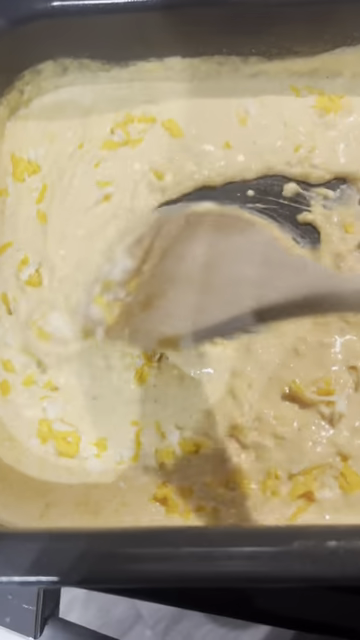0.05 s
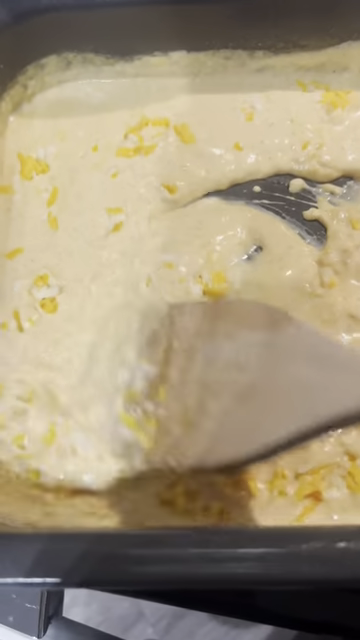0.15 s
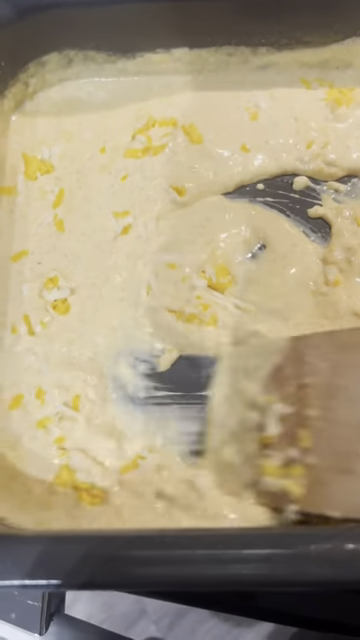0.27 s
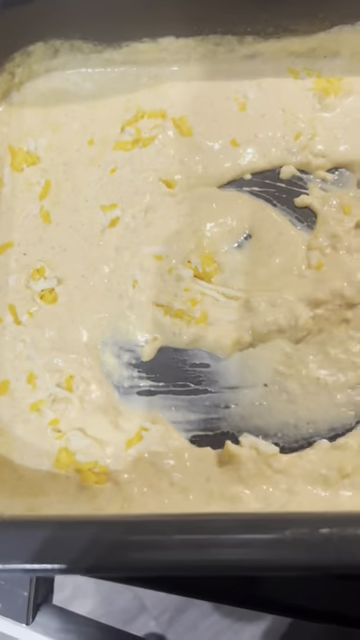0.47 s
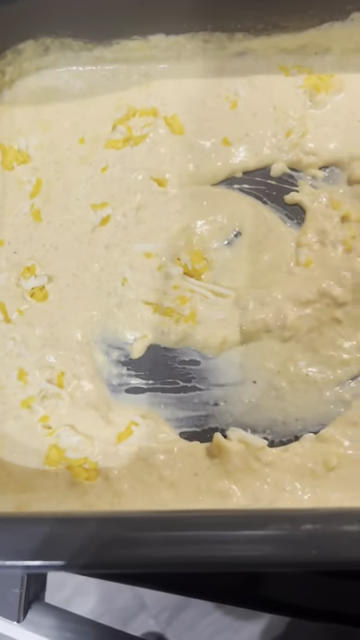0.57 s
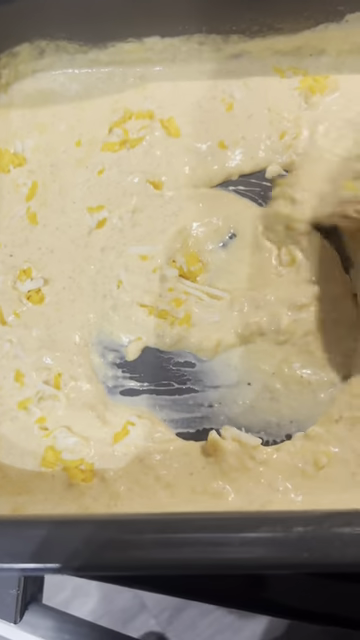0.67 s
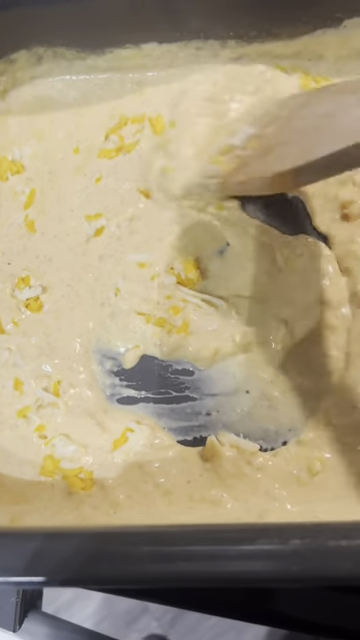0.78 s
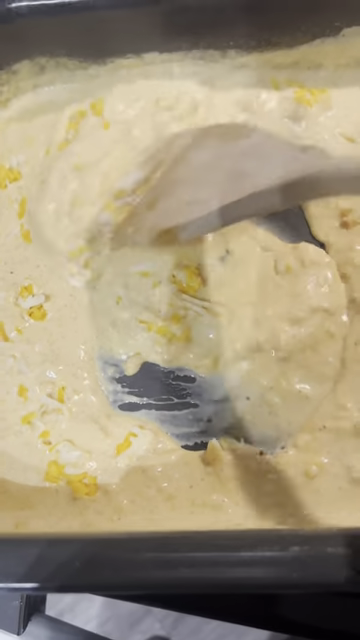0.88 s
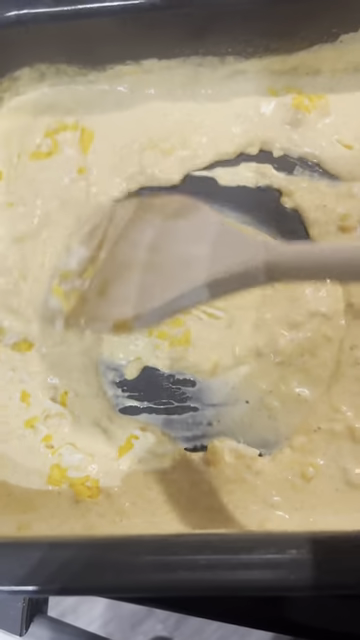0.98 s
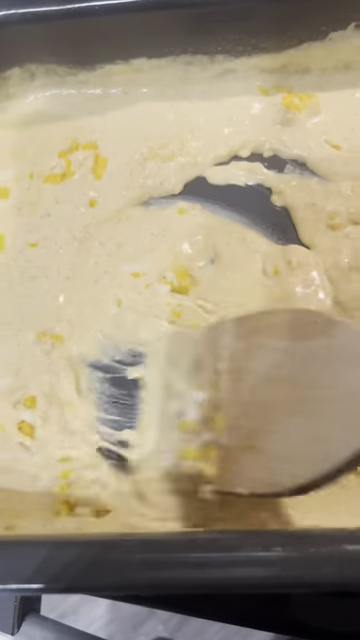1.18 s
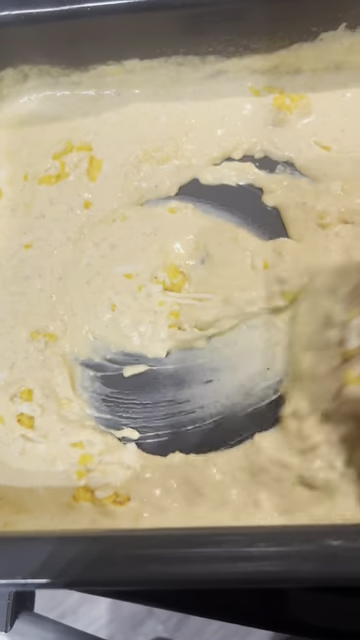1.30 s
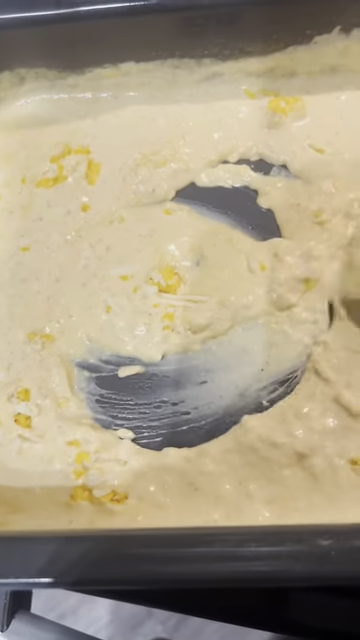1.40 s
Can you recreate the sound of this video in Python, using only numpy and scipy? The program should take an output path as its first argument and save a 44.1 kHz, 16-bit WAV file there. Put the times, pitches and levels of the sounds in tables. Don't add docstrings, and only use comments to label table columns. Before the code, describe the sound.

Wooden spoon stirring thick sauce, soft scraping and squelching, one hollow knock, low fan rush behind

```python
import sys
import numpy as np
from scipy import signal
from scipy.fft import rfft, irfft, next_fast_len
from scipy.io import wavfile
from scipy.ndimage import uniform_filter1d, map_coordinates

SR = 44100
rng = np.random.default_rng(int(sys.argv[2]) if len(sys.argv) > 2 else 0)


def waveform_to_disk(signal):
    frames = np.transpose(np.atleast_2d(signal))
    scaled = np.clip(frames, -1, 1) * 32767
    samples = np.round(scaled).astype(np.int16)
    wavfile.write(sys.argv[1], SR, samples)


def field_ratio(decibels):
    return 10 ** (np.asarray(decibels, dtype=float) / 20)


N = 63945

# (frequency [Hz], correlation [1])
LIKENESS = [(60, .98), (150, .97), (290, .83), (640, .2), (1400, .5), (3100, .4), (6800, .5), (15000, .7)]

# (frequency [Hz], density [dB/Hz])
FAN_SPECTRUM = [(20, -18.5), (45, -10.5), (128, -8.5), (340, -11.5), (600, -18), (2020, -34.5), (4500, -46),
                (12500, -55), (14600, -76)]
# (time [s], level [dB])
FAN_LOAD = [(0, 0), (.6, -1), (.9, 1), (1.2, .5), (1.45, -0.5)]
# (frequency [Hz], width [Hz], level [dB])
RUMBLE_MODES = [(65, 23.5, 1), (84, 37.3, 2)]
# (frequency [Hz], level [dB rms])
MAINS_HUM = [(120, -64.5)]
FAN_DB, RUMBLE_DB = -56, -64.5

# (time [s], pressure [dB], wetness [dB], sauce hollow pitch [Hz])
STROKE = [(0, -61.5, -2.5, 750), (.075, -67, 6.5, 853), (.104, -68.5, -1, 719), (.2, -67, -5.5, 750),
          (.29, -72, -6.5, 720), (.40, -92, 9.5, 768), (.6, -87.5, 9, 754), (.65, -65, 1.5, 950),
          (.72, -59, -10.5, 1000), (.745, -55, -3, 1050), (.86, -56, -5, 1228), (.965, -60.5, -3.5, 1000),
          (1.0, -63, -5, 740), (1.12, -72, -4, 700), (1.21, -66.5, -9, 717), (1.32, -86, -22, 717),
          (1.34, -90, -1, 734), (1.45, -73, -8, 700)]
# (time [s], pitch [Hz])
GAP_PITCH = [(0, 1750), (.04, 1850), (.08, 2400), (.2, 2505), (.645, 1942), (.7, 2403), (.82, 2495),
             (.87, 2106), (.925, 1750), (1.0, 1905), (1.06, 2480), (1.2, 1682), (1.45, 2315)]
# (frequency [Hz], density [dB/Hz])
SLIDE_SPECTRUM = [(180, -52), (300, -18), (389, -15.5), (566, -26), (1180, 1), (1490, -6.5), (5000, -28),
                  (6500, -76), (11000, -120)]
# (frequency [Hz], width [Hz], level [dB])
PAN_MODES = [(1750, 78, 3), (2280, 34, -7), (2502, 56, 6), (3200, 37, 1.5), (4000, 160, -7.5),
             (6300, 57, -20)]
# (frequency [Hz], width [Hz], level [dB])
GROAN_MODES = [(328, 120, -3.5), (525, 13, 1), (700, 103, 0)]
# (frequency [Hz], density [dB/Hz])
FIZZ_SPECTRUM = [(1760, -16.5), (3000, -8), (3260, -12.5), (3560, -8.5), (7850, -14.5), (13700, -42),
                 (15500, -50)]
HOLLOW_DB, GAP_DB, BODY_DB, GROAN_DB = -5.5, -7.5, -5.5, -2.5
HOLLOW_WIDTH_HZ, GAP_WIDTH_HZ, LEFT_DB = 104, 220, -0.5

# (time [s], peak [dB], pitch [Hz], spread [octaves], t60 [s])
SQUELCHES = [(.012, -54.5, 1790, 0.31, 0.22), (.06, -56, 2220, 0.13, .03), (.065, -57, 5500, 0.13, 0.087),
             (.08, -64, 2430, .1, .04), (.04, -63, 4680, .2, .1), (.15, -56.5, 387, 0.073, 0.083),
             (.565, -68, 7400, 0.31, 0.58), (.635, -46.5, 700, 0.7, 0.32), (.84, -50, 2170, 0.44, 0.41),
             (.9, -57, 1920, 0.23, .3), (.645, -63.5, 1950, 0.072, 0.037), (.66, -50, 962, 0.12, 0.15),
             (.67, -47.5, 447, 0.39, 0.13), (.69, -52.5, 937.6, 0.12, 0.11), (.69, -68, 2350, 0.14, .15),
             (.737, -45, 850, 0.77, 0.041), (.75, -50, 700, 0.31, 0.22), (.76, -56, 3240, 0.068, 0.12),
             (.789, -49.5, 1170, .15, 0.041), (.835, -55, 1170, .12, 0.064), (.832, -51, 1971, .2, 0.05),
             (.852, -53.5, 3150, 0.073, 0.039), (.872, -59, 2140, 0.14, 0.033),
             (.917, -52, 1750, 0.11, 0.033), (.96, -61, 3000, 0.081, 0.09), (.963, -51, 700, .6, .03),
             (1.115, -57, 680, 0.17, 0.3), (1.19, -57.5, 693, .15, 0.45), (1.2, -59, 1350, .3, 0.19),
             (1.295, -60, 700, 0.12, 0.076), (1.295, -62.5, 1230, 0.36, .12),
             (1.312, -50, 380, 0.29, 0.081), (1.32, -51.5, 230, 0.42, 0.071)]
# (time [s], peak [dB], pitch [Hz], spread [octaves], t60 [s])
FILM_POPS = [(.104, -61.5, 9500, .5, .01), (.1516, -53.5, 2430, 0.22, 0.029),
             (.152, -52.5, 5550, 1.1, 0.012), (.3157, -48.5, 6700, 0.48, 0.015),
             (.3446, -61.5, 3300, 0.054, 0.094), (.336, -67, 13000, .3, .03),
             (.405, -64, 13700, 0.83, 0.024), (.4898, -58, 14500, 0.88, .015),
             (.5641, -67.5, 12000, 0.95, 0.016), (.581, -69, 14430, .3, .015),
             (.6374, -50, 14200, 0.51, 0.021), (.6505, -64, 14500, .3, .015),
             (.682, -71, 13500, .5, 0.0093), (.633, -64, 3870, 0.082, .03),
             (.6405, -53.5, 2400, 0.44, 0.011), (.7357, -47, 5600, 1.5, 0.023),
             (.746, -44, 2300, 0.75, 0.018), (.7465, -57, 12500, 0.97, 0.026),
             (1.0311, -45, 14500, 0.59, 0.02), (1.04, -72, 14300, .5, 0.033),
             (1.1144, -61.5, 4560, 0.5, .02), (1.123, -59.5, 9940, 0.83, 0.0091),
             (1.137, -68, 14500, 0.54, 0.023), (1.1997, -61, 9430, 0.5, .015),
             (1.2381, -60.5, 10100, 0.38, 0.012), (1.3259, -59.5, 15000, .3, .015),
             (1.341, -64, 14200, 0.7, 0.016), (1.378, -70, 12100, .5, .012), (1.389, -75, 15000, .2, .08)]

# (time [s], length [s], level [dB])
THROWS = [
    (0.218, 0.084, -66),
    (0.321, 0.076, -65.5),
]
# (frequency [Hz], density [dB/Hz])
SPRAY_SPECTRUM = [(1470, -25), (2500, -6.5), (3830, -16.5), (8100, -8), (15500, -26)]

# (frequency [Hz], level [dB], t60 [s], left minus right [dB], left lag [cycles])
EDGE_MODES = [(990, -7, .065, 4.5, .72), (515, -5.5, .14, -6, .62), (1381, -27, .09, 2, .8),
              (1149, -9, .03, -3, .54), (2455, -27, .04, -1, .2)]
# (frequency [Hz], level [dB], t60 [s], left minus right [dB], left lag [cycles])
FLAT_MODES = [(490, -3.5, .062, -1.7, .24), (776, -8.5, .056, -6.3, .03), (655, -6, .03, -5, .08),
              (341, -20, .12, 0, .05), (245, -24, .1, 2, 0)]
# (frequency [Hz], level [dB], t60 [s])
LINGER_MODES = [(520.6, -25, 0.33), (566, -27.5, 0.3), (682, -34, 0.16), (754, -41, 0.28), (914, -39, 0.47),
                (1086, -51, 0.5), (352.2, -32, 0.18), (1240, -50, .2)]
# (time [s], level [dB])
ROCKING = [
    (.252, 2),
    (.26, -1.5),
    (.283, 1),
    (.291, -1),
    (.33, 3.5),
    (.342, -10),
    (.36, 10),
    (.4, 7),
    (.412, -14),
]
KNOCK_S, FLAT_LATE_S, CONTACT_S = .2227, .0024, .0013
KNOCK_DB, CRACK_DB = -16, -24
SLAP_DB, SLAP_LENGTH_S, SLAP_HZ = -28, 0.058, 1600

# (frequency [Hz], t60 [s])
ROOM_DECAY = [(200, 0.16), (1000, 0.59), (3000, 0.68), (8000, 0.28)]
ROOM_DB = -15


def unit(x):
    return x / np.sqrt(np.mean(x ** 2) + 1e-20)


def along(points, hz):
    f, v = np.transpose(points)
    return np.interp(np.log(hz + 1), np.log(f + 1), v)


def curves(rows):
    s, *cols = np.transpose(rows)
    return [np.interp(np.arange(N) / SR, s, c) for c in cols]


def wobble(rate_hz):
    return map_coordinates(rng.standard_normal(N // 64), [np.arange(N) * rate_hz / SR])


def filtered(x, response):
    m = next_fast_len(N + SR // 2)
    return irfft(rfft(x, m) * response(np.fft.rfftfreq(m, 1 / SR)), m)[..., :N]


def shaped(x, spectrum):
    return filtered(x, lambda hz: field_ratio(along(spectrum, hz)))


def peaks(modes):
    def response(f):
        total = 0
        for k, (hz, width_hz, db) in enumerate(modes):
            loss = 1j * f * width_hz
            total = total + (-1) ** k * field_ratio(db) * loss / (hz * hz - f * f + loss)
        return total
    return response


def peaks_twice(x, modes):
    return filtered(x, lambda hz: peaks(modes)(hz) ** 2)


def slips(grit_db):
    pair = rng.standard_normal((2, N))
    grit = 9.1 * uniform_filter1d(rng.standard_normal(N), size=36)
    pair = pair * field_ratio(grit_db * grit)

    def mid_side_gain(hz):
        turn = np.arccos(np.clip(along(LIKENESS, hz), -1, 1)) / 2
        return np.array([np.cos(turn), np.sin(turn)])

    mid, side = filtered(pair, mid_side_gain)
    return np.array([mid + side, mid - side])


def patchy(x, depth_db):
    z = signal.stft(x, nperseg=256)[2]
    field = uniform_filter1d(rng.standard_normal(z.shape[1:]), size=4, axis=0)
    field = unit(uniform_filter1d(field, size=14, axis=1))
    return unit(signal.istft(z * field_ratio(depth_db * field), nperseg=256)[1][:, :N])


def moving(hz, width_hz):
    a, b = (filtered(slips(grit_db=3), lambda f: 1 / (1 + (2 * f / width_hz) ** 2)) for _ in range(2))
    phase = 2 * np.pi * np.cumsum(hz) / SR
    return unit(a * np.sin(phase) + b * np.cos(phase))


def kitchen():
    load_db, = curves(FAN_LOAD)
    rush = unit(shaped(slips(grit_db=2), FAN_SPECTRUM))
    rumble = field_ratio(RUMBLE_DB) * unit(peaks_twice(slips(grit_db=0), RUMBLE_MODES))
    hum = 0
    for hz, db in MAINS_HUM:
        tone = np.sin(2 * np.pi * hz * np.arange(N) / SR)
        hum = hum + field_ratio(db + 3.5 + 0.46 * wobble(2.9)) * tone
    rush = field_ratio(FAN_DB - 3 + 2.4 * wobble(8.06)) * rush
    return field_ratio(load_db) * (rush + rumble + hum)


def drag():
    press_db, wet_db, hollow_hz = curves(STROKE)
    gap_hz, = curves(GAP_PITCH)
    slide = patchy(shaped(slips(grit_db=1), SLIDE_SPECTRUM), depth_db=2.5)
    body = field_ratio(BODY_DB) * unit(filtered(slips(grit_db=5), peaks(PAN_MODES)))
    groan = unit(peaks_twice(slips(grit_db=-0.5), GROAN_MODES))
    hollow = field_ratio(HOLLOW_DB) * moving(hollow_hz, HOLLOW_WIDTH_HZ)
    gap = field_ratio(GAP_DB) * moving(gap_hz, GAP_WIDTH_HZ)
    fizz = patchy(shaped(slips(grit_db=0.5), FIZZ_SPECTRUM), depth_db=3.5)
    groan = field_ratio(GROAN_DB + 1.8 * wobble(14)) * groan
    rub = field_ratio(1.2 * wobble(25)) * (slide + body + hollow + gap + groan)
    wet = field_ratio(wet_db + 1.6 * wobble(30)) * fizz
    return field_ratio(press_db - 3) * (rub + wet) * field_ratio([[LEFT_DB], [0]])


def pops(events):
    size, lead = 8192, 512
    out = np.zeros((2, N + size))
    t, f = np.arange(4096) / SR, np.fft.rfftfreq(size, 1 / SR)
    for s, db, hz, octaves, t60 in events:
        noise = rng.standard_normal((3, 4096))
        burst = noise[0] + 0.65 * noise[1:]
        burst = burst * field_ratio(-60 * t / t60) * np.minimum(t / t60 * 25, 1)
        bell = np.exp(-2 * (np.log2((f + 1) / hz) / octaves) ** 2)
        band = irfft(rfft(np.pad(burst, ((0, 0), (lead, 0))), size) * bell)
        out[:, round(s * SR) - lead:][:, :size] += field_ratio(db) * band / np.abs(band).max()
    return np.array([np.roll(out[0], shift=1), out[1]])[:, :N]


def splash():
    t = np.arange(N) / SR
    gate = 0
    for s, length_s, db in THROWS:
        rise = np.clip((t - s) / 0.02, 0, 1)
        stop = np.clip((s + length_s - t) / 0.028, 0, 1)
        gate = gate + field_ratio(db - 60 * (t - s)) * rise * stop
    return gate * patchy(shaped(slips(grit_db=2), SPRAY_SPECTRUM), depth_db=1.5)


def ring(modes, start_s, contact_s):
    t = np.maximum(np.arange(N) / SR - start_s, 0)
    side = np.array([[.5], [-.5]])
    tones = 0
    for k, (hz, db, t60, pan_db, lag) in enumerate(modes):
        level = field_ratio(db + pan_db * side - 60 * t / t60)
        tone = np.sin(2 * np.pi * (hz * t - lag * (side + .5)))
        onset = 1 - np.exp(-(t * hz / (1000 * contact_s)) ** 2)
        tones = tones + (-1) ** k * level * tone * onset
    return tones


def knock():
    t = np.maximum(np.arange(N) / SR - KNOCK_S, 0)
    rock_db, = curves(ROCKING)
    crack_gate = (field_ratio(-60 * t / .015) + .45 * field_ratio(-60 * t / .26 + rock_db - 3)) * (t > 0)
    crack = peaks_twice(slips(grit_db=0) * crack_gate, [(1500, 2400, 0)])
    linger = 0
    for hz, db, t60 in LINGER_MODES:
        linger = linger + field_ratio(db - 60 * t / t60) * moving(np.full(N, hz), width_hz=hz / 35)
    linger = linger * (1 - np.exp(-t / .012)) * field_ratio(rock_db)
    slap_gate = field_ratio(SLAP_DB - 100 * t) * (t > 0) * np.clip((SLAP_LENGTH_S - t) / .006, 0, 1)
    slap = peaks_twice(slips(grit_db=2.5) * slap_gate, [(SLAP_HZ, 1900, 0)])
    edge = ring(EDGE_MODES, KNOCK_S, CONTACT_S)
    flat = ring(FLAT_MODES, KNOCK_S + FLAT_LATE_S, CONTACT_S / 5)
    blow = edge + flat + linger + slap + field_ratio(CRACK_DB) * crack
    return field_ratio(KNOCK_DB) * filtered(blow, lambda hz: 1 / (1 + (200 / (hz + 1)) ** 6))


def room(x):
    hz, t, z = signal.stft(slips(grit_db=1.5)[:, :SR // 2], SR, nperseg=256)
    decay = field_ratio(-60 * t / along(ROOM_DECAY, hz)[:, None])
    tail = signal.istft(z * decay, SR, nperseg=256)[1]
    tail = tail / np.linalg.norm(tail[0])
    late = np.pad(x.mean(axis=0), (400, 0))[None]
    return signal.fftconvolve(late, tail, axes=1)[:, :N]


def scene():
    near = drag() + knock() + splash() + pops(FILM_POPS) + pops(SQUELCHES)
    return near + field_ratio(ROOM_DB) * room(near) + kitchen()


def low_pass(x):
    return signal.sosfilt(signal.butter(12, 16400, fs=SR, output="sos"), x)


def record(dry):
    mix = filtered(dry, lambda hz: 1 / (1 + (hz / 15900) ** 60))
    return low_pass(mix)


dry = scene()
out = record(dry)
waveform_to_disk(out)
```